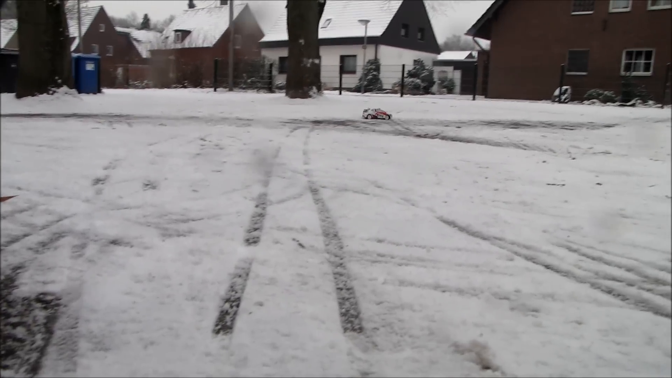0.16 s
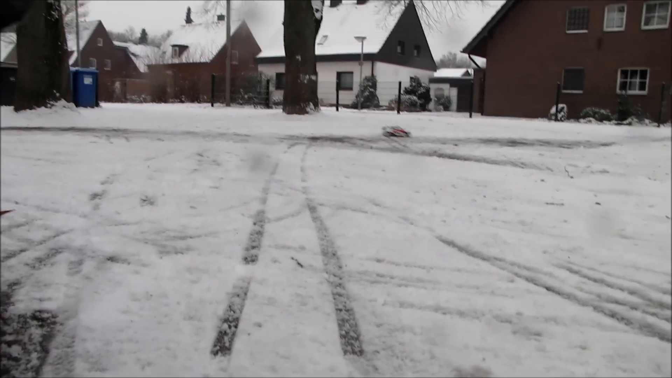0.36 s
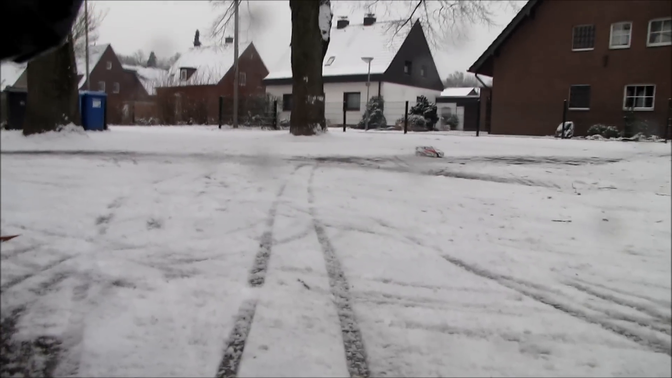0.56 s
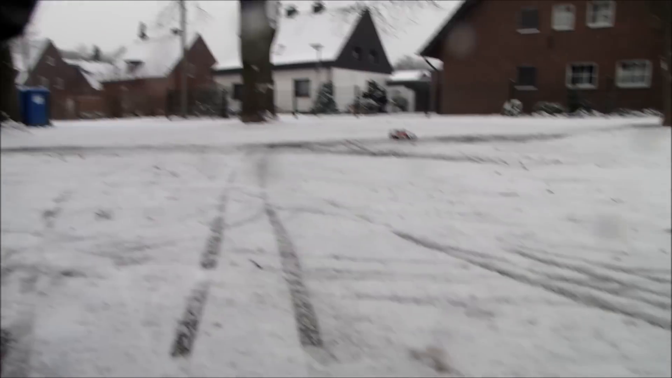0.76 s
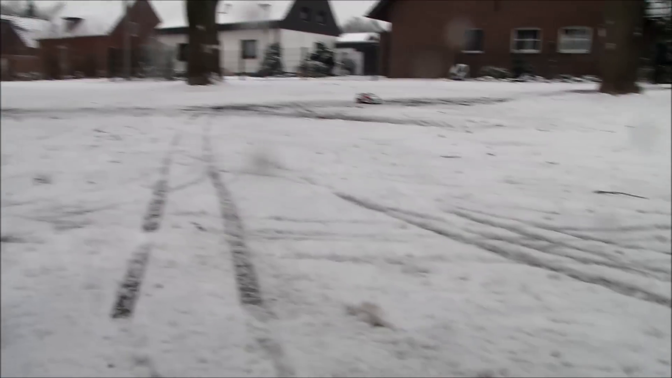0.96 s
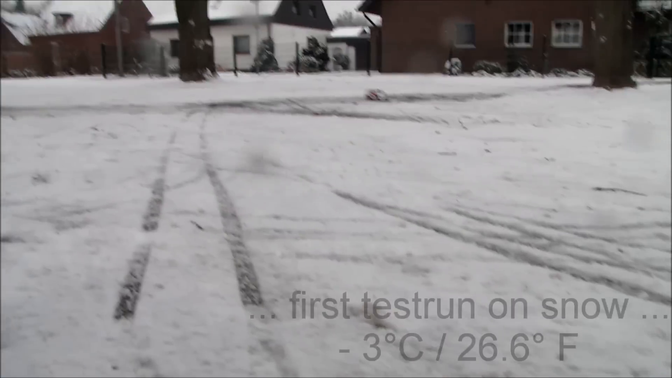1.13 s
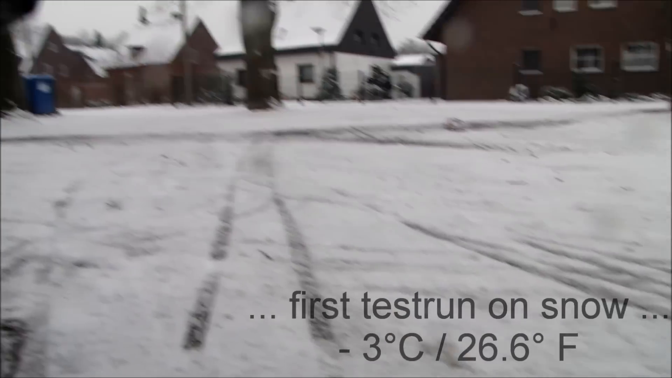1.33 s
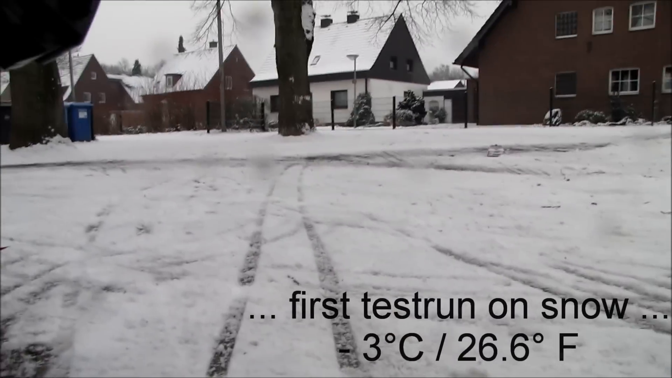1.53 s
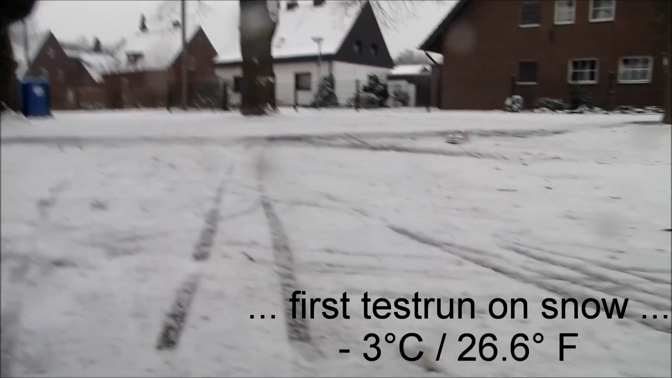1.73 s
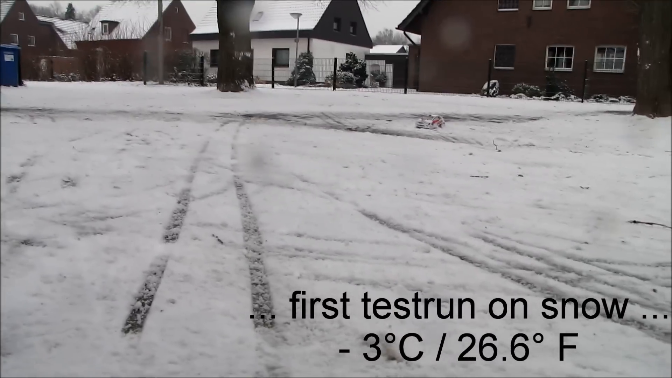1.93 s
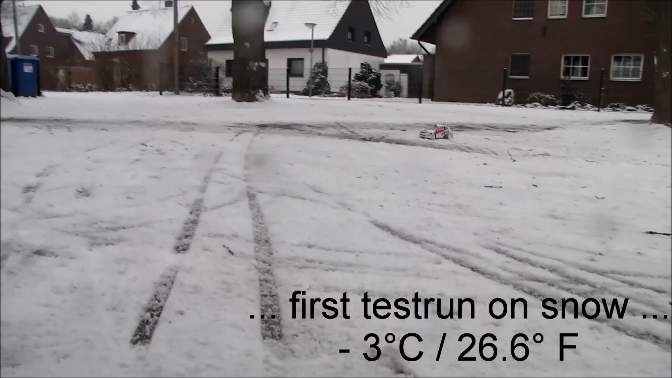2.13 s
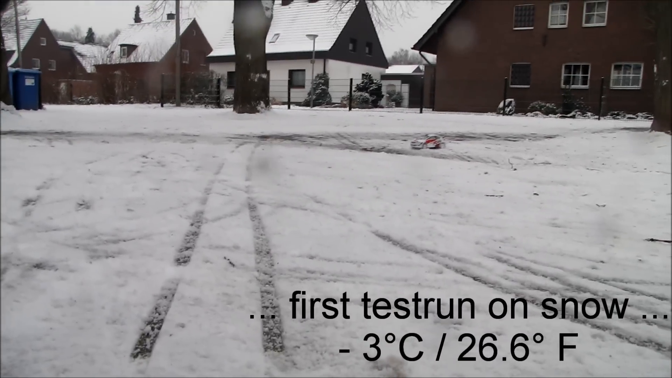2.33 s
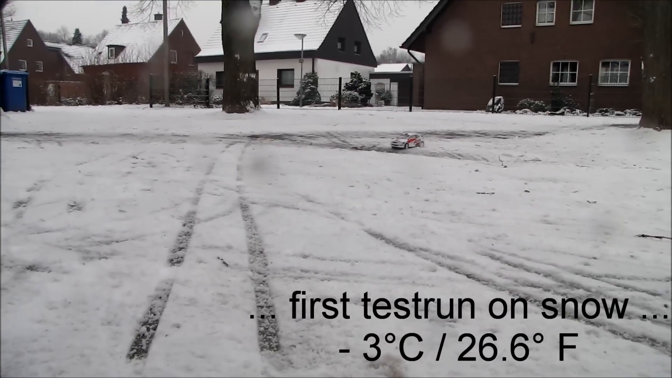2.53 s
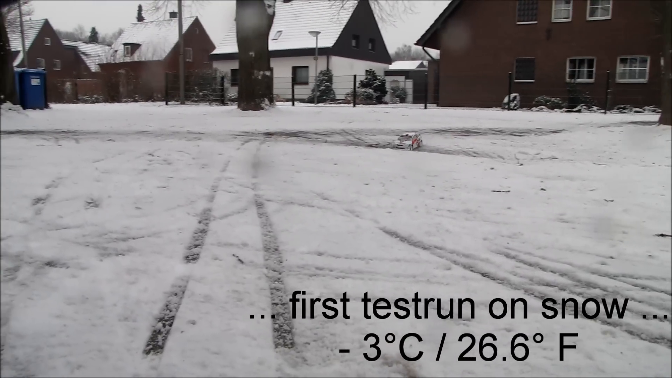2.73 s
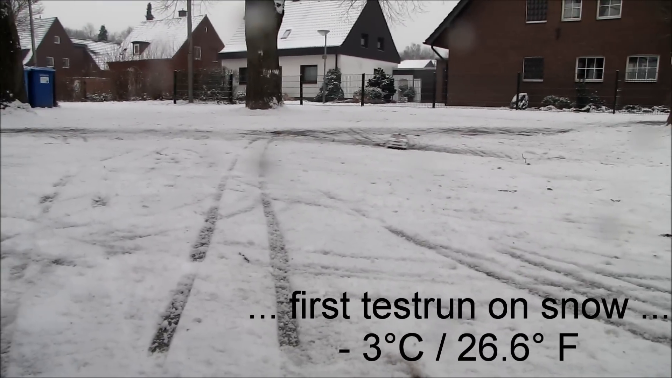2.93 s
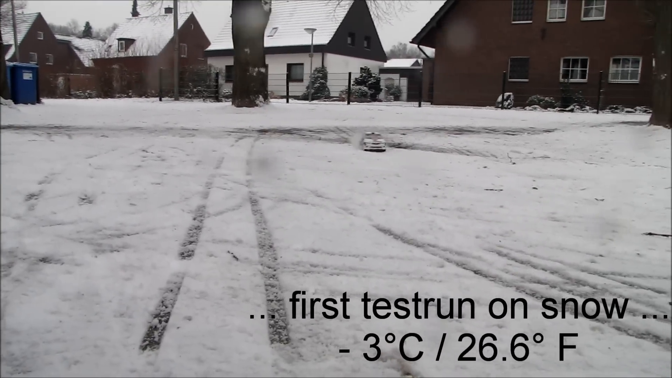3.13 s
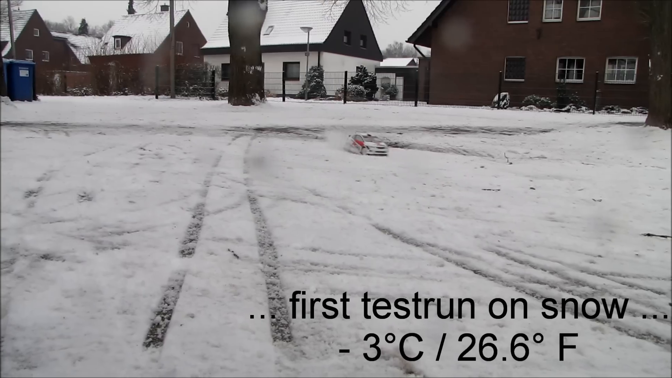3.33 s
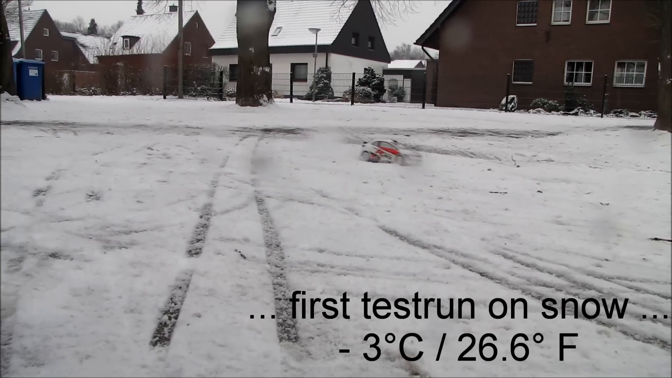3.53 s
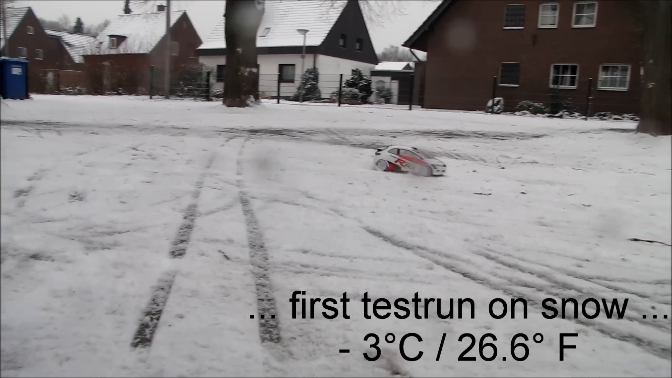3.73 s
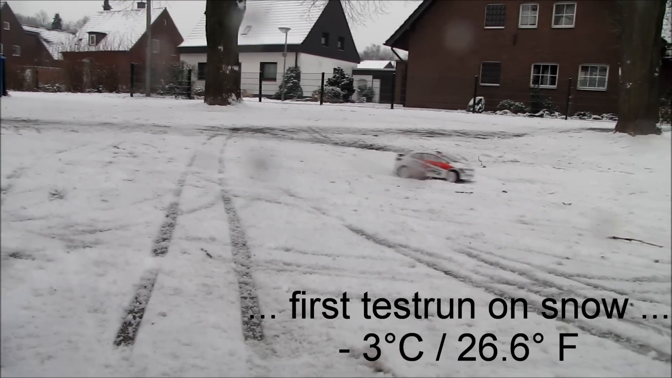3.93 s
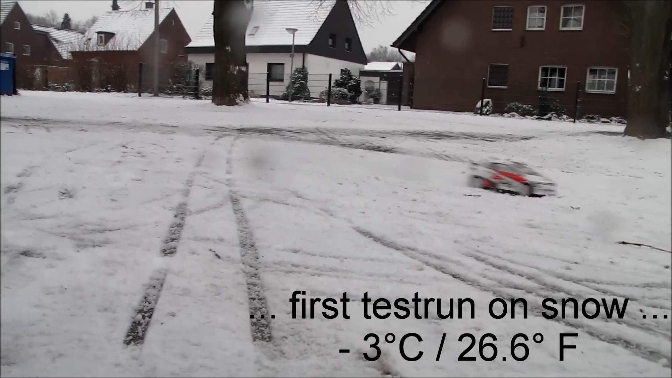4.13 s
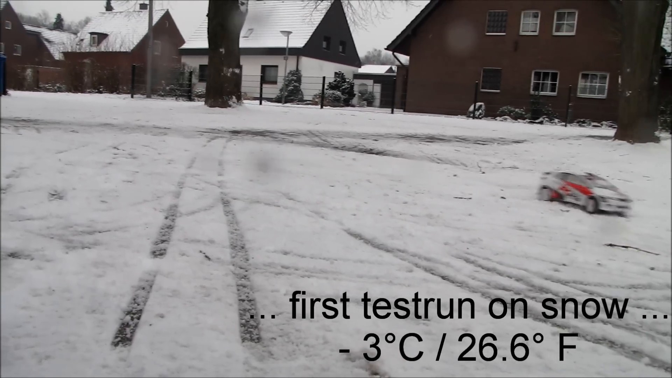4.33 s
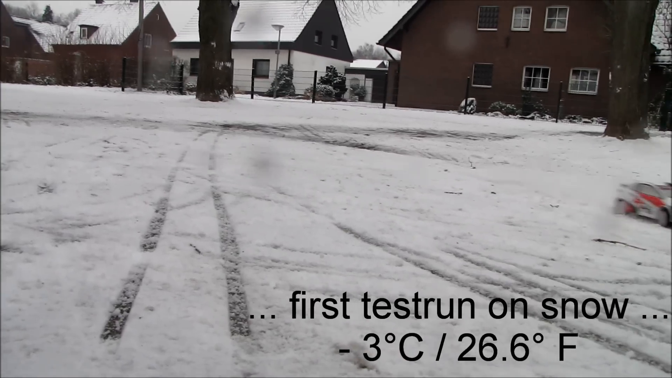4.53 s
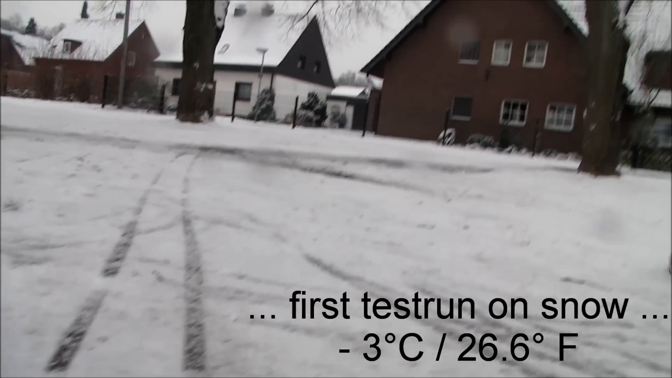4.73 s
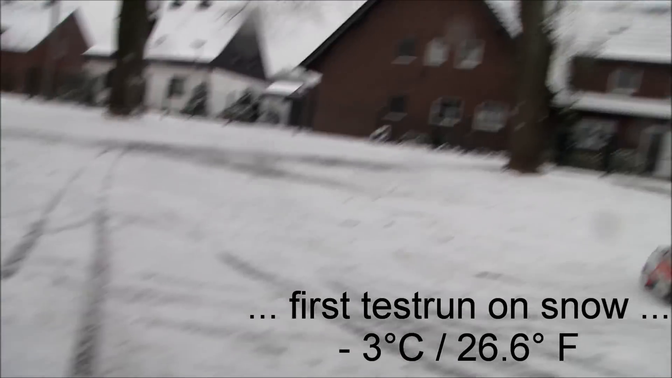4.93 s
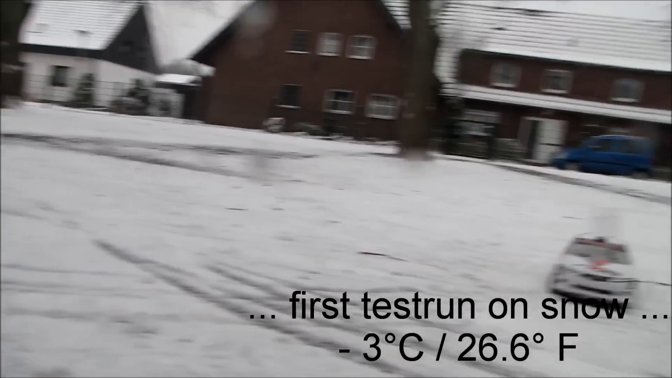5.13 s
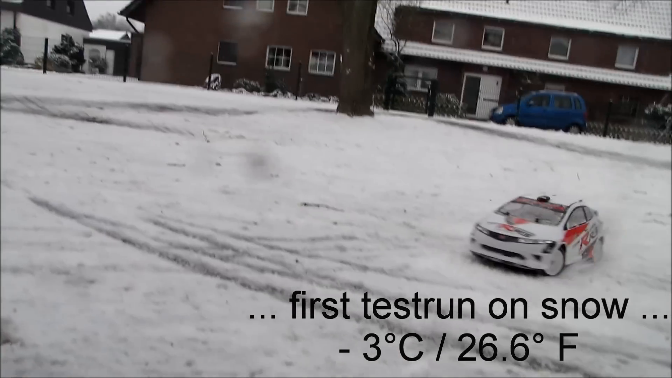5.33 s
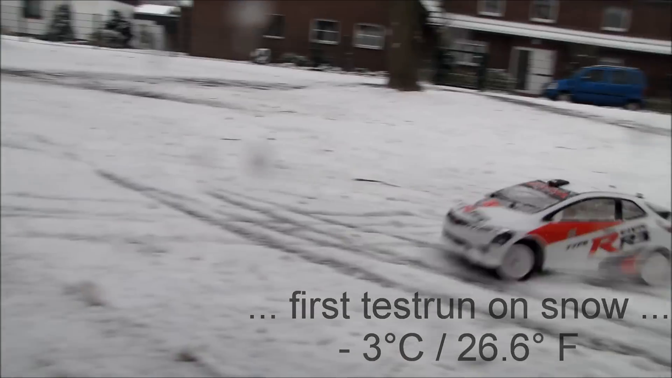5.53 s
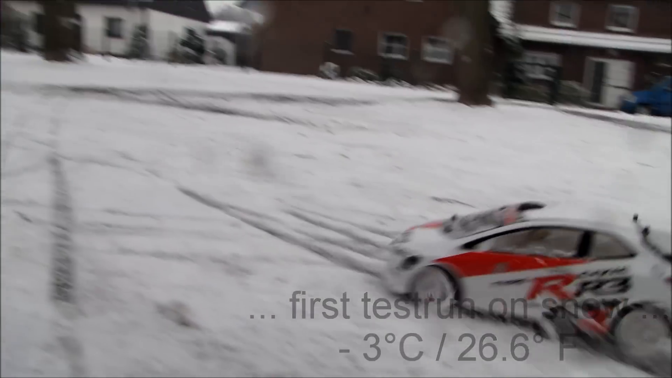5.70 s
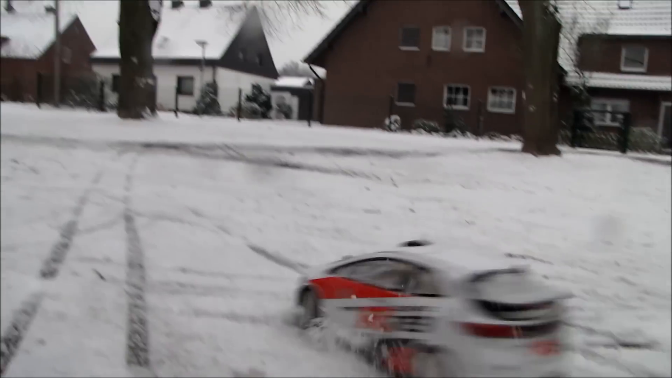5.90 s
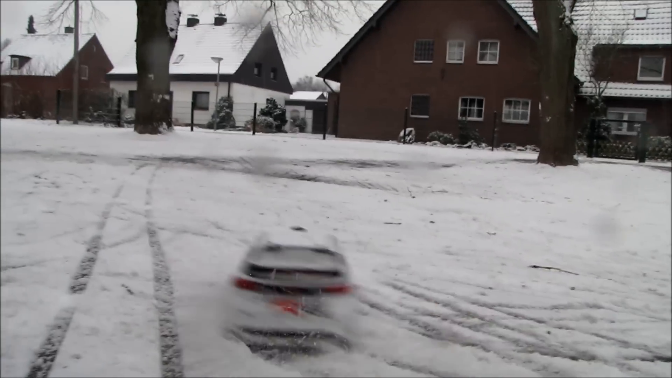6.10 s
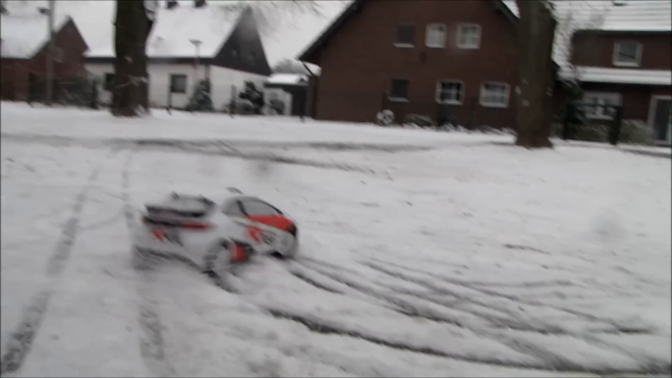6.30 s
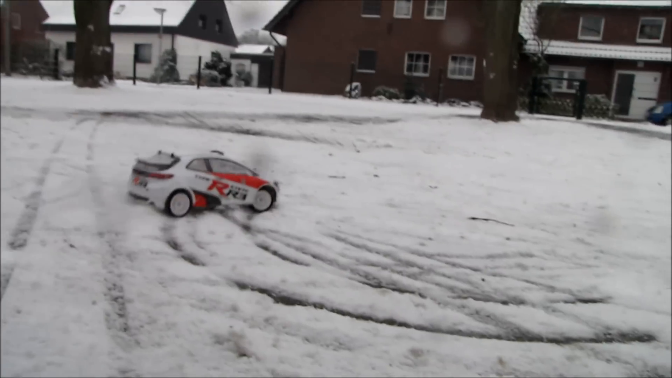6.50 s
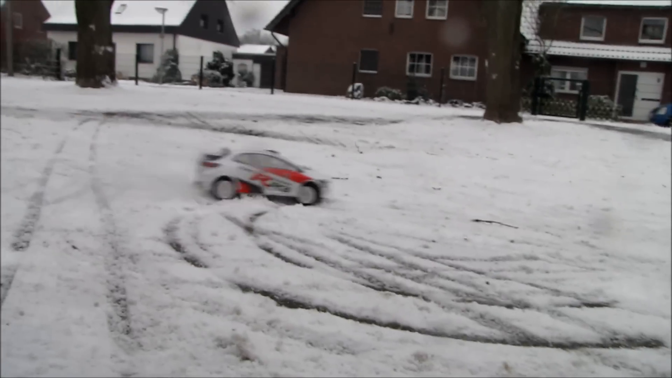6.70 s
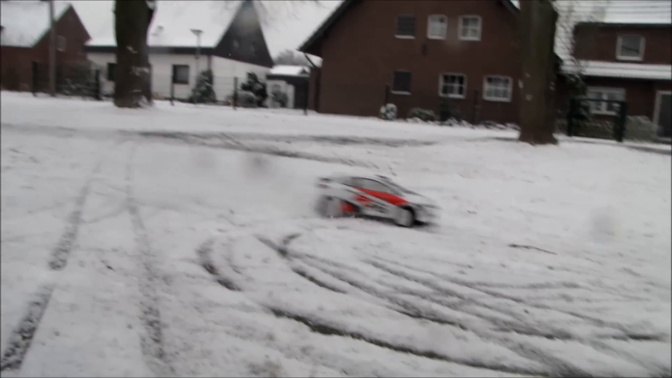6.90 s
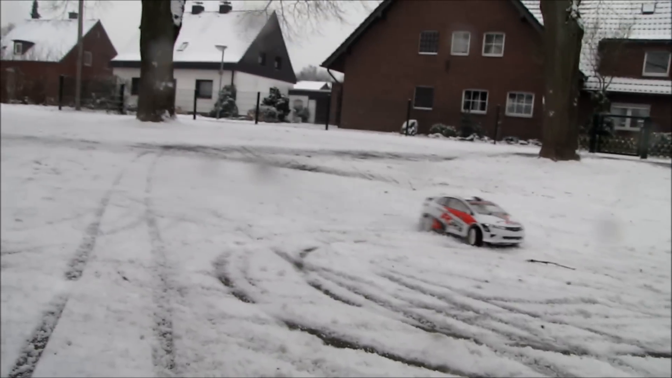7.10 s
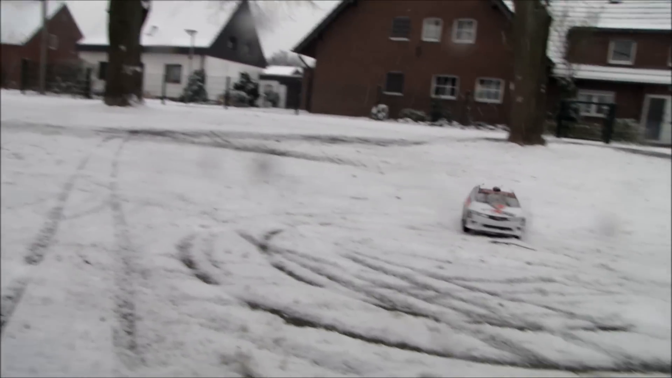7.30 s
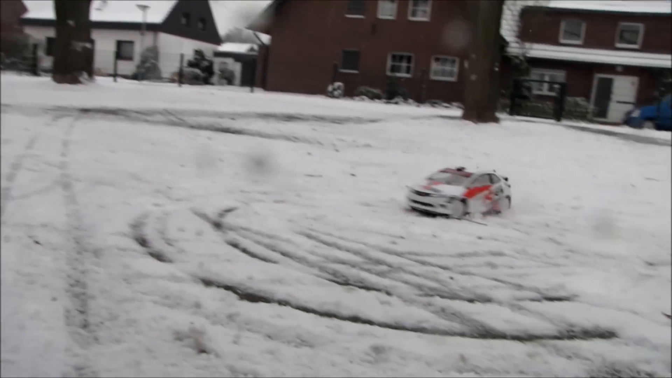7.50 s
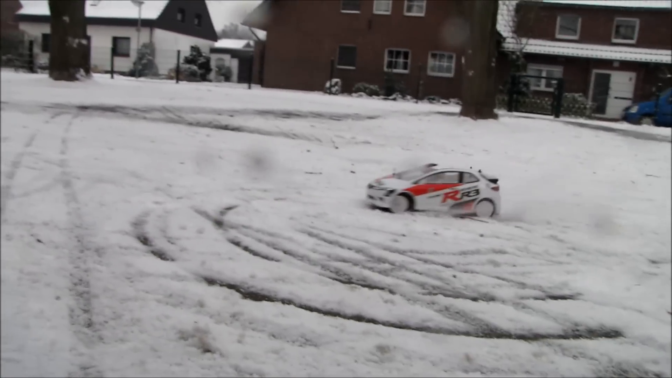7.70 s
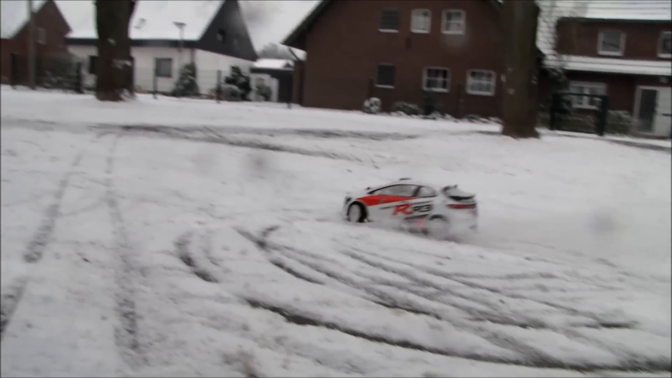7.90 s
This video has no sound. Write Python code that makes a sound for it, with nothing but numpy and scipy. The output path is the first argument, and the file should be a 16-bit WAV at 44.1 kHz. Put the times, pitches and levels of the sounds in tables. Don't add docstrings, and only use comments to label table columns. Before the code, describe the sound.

A small electric model car whines faintly far off, then screams closer in jerky throttle bursts, rattling and knocking over rutted snow outdoors.

```python
import sys
import numpy as np
from scipy import signal
from scipy.fft import rfft, irfft, next_fast_len
from scipy.io import wavfile
from scipy.ndimage import uniform_filter1d, map_coordinates

SR = 44100
rng = np.random.default_rng(int(sys.argv[2]) if len(sys.argv) > 2 else 0)


def int16_out(signal):
    q = np.round(np.clip(np.atleast_2d(signal).T, -1, 1) * 32767)
    wavfile.write(sys.argv[1], SR, q.astype(np.int16))


def amplitude_ratio(level_db):
    exponent = np.asarray(level_db, float) / 20
    return 10 ** exponent


N = 350595

# (frequency [Hz], share [0-1])
ALIKE_SHARE = [(40, 0.9), (150, 0.99), (330, 1), (500, 0.91), (1500, 0.8), (4000, 0.71), (9000, 0.61),
               (15000, 0.51)]


def unit(x):
    return x / np.sqrt(np.mean(x ** 2) + 1e-20)


def along(points, hz):
    f, v = np.transpose(points)
    return np.interp(np.log(hz + 1), np.log(f + 1), v)


def curves(rows):
    s, *cols = np.transpose(rows)
    return [np.interp(np.arange(N) / SR, s, c) for c in cols]


def wobble(rate_hz):
    knots = rng.standard_normal(int(N * rate_hz / SR) + 4)
    return unit(map_coordinates(knots, [np.arange(N) * rate_hz / SR]))


def filtered(x, response):
    m = next_fast_len(N + SR // 2)
    return irfft(rfft(x, m) * response(np.fft.rfftfreq(m, 1 / SR)), m)[..., :N]


def modes(table):
    def response(f):
        total = 0
        for k, (hz, width_hz, db) in enumerate(table):
            ring = 1j * f * width_hz / (hz * hz - f * f + 1j * f * width_hz)
            total = total + (-1) ** k * amplitude_ratio(db) * ring
        return total
    return response


def gritty(rate_hz, spread_db, share):
    hit, size, sign = rng.random((3, N))
    grit = (hit < rate_hz / SR) * amplitude_ratio(-spread_db * np.log(size + .02)) * np.sign(sign - .5)
    share = np.clip(share, 0, 1)
    return np.sqrt(share) * unit(grit) + np.sqrt(1 - share) * rng.standard_normal(N)


def tone(hz, db, blur_rad, flutter_db):
    phase = 2 * np.pi * np.cumsum(hz) / SR + blur_rad * (wobble(130) + .6 * wobble(400))
    flutter = amplitude_ratio(flutter_db * (.45 * wobble(30) + wobble(110)))
    return np.sqrt(2) * amplitude_ratio(db) * unit(flutter) * np.sin(phase)


def drive():
    # (time [s], gear mesh [Hz], mesh load over grind [dB], motor load over hiss [dB])
    far_kick = [(0, 960, -14, -15), (.2, 895, -19, 0), (.38, 961, -26, -15), (.45, 1000, -5, 8),
                (.52, 1050, -14, 6), (.6, 993, -12, -11), (.7, 938, -21, -10)]
    far_circle = [(.85, 920, -22, -1), (.95, 1000, -22, 8), (1.06, 1020, -22, 7), (1.12, 975, -20, 11),
                  (1.3, 1010, -14, 13), (1.46, 1030, -11, 12), (1.54, 640, -8, -14), (1.63, 960, -5, -10),
                  (1.7, 990, -6, -8), (1.78, 995, -12, -14)]
    pull_away = [(2.36, 969, -18, -8), (2.44, 975, -3, -8), (2.53, 1066, -4, -17), (2.63, 1700, -8, -20),
                 (2.7, 1700, -9, -24), (2.78, 1450, -10, -22), (2.95, 1523, -14, -18)]
    run_in = [(3.0, 1584, -10, -4), (3.05, 1970, -24, -3), (3.09, 1990, -26, -3), (3.13, 2312, -19, -6),
              (3.25, 2270, -17, -5), (3.3, 2420, -4, -2), (3.36, 2280, -20, -5), (3.47, 2050, -24, -6),
              (3.55, 1809, -23, -14)]
    crawl = [(3.849, 902, -29, -32), (4.402, 994, -10.5, -28), (4.9, 1008, -28, -0.5),
             (5.15, 1500, -32, -18), (5.4, 1006, -14, 2), (5.8, 966, -14, -5), (5.95, 930, -10, -8),
             (6.29, 1012, -17, 2)]
    slide = [(6.3, 2200, -16, -13), (6.36, 2100, -16, -12), (6.42, 1700, -22, -16), (6.5, 1850, -20, -11),
             (6.56, 1850, -20, -13), (6.6, 1200, -17, 0), (6.66, 1200, -15, 4)]
    spin = [(6.7, 1600, -12, 1), (6.76, 1638, -3, -1), (6.8, 2352, 0, -1), (6.83, 2965, -3, -2),
            (6.9, 3296, -5, 0), (6.96, 3049, -10, -1), (7.0, 2650, -14, 0), (7.035, 1800, -14, -2),
            (7.1, 1300, -18, -19)]
    regrip = [(7.15, 1300, -8, 0), (7.17, 1534, -9, 3), (7.22, 1950, -13, -3), (7.25, 2050, -15, -18),
              (7.31, 2100, -15, -14), (7.35, 2142, -13, -12), (7.37, 1640, -20, -9), (7.46, 1680, -14, -7),
              (7.49, 1560, -10, -2)]
    leaving = [(7.53, 1480, -6, 1), (7.565, 1500, -5, -2), (7.6, 1588, -4, 0), (7.68, 1799, -2, 2),
               (7.73, 1821, -3, -9), (7.77, 2005, -2, 0), (7.82, 2040, -4, 5), (7.88, 2260, -4, 5),
               (7.95, 2332, -5, 3)]
    # (top speed time [s], top mesh [Hz], mesh load [dB], motor load [dB], unloading [dB/s])
    stabs = [
        (4.045, 4000, -3, -5, 110),
        (4.505, 2900, -7, -4, 160),
        (5.518, 3200, 1, -3, 400),
        (6.052, 2650, -8, -13, 100),
        (6.135, 3700, -4, -13, 100),
    ]
    spin_up_hz_per_s, coast_hz_per_s, held_s, inertia_s = 28000, 11000, .012, .015
    mesh_builds_db_per_s, motor_strains_db_per_s = 50, 70
    motor_unloads = 1.2

    t = np.arange(N) / SR
    state = np.array(curves(far_kick + far_circle + pull_away + run_in + crawl + slide + spin
                            + regrip + leaving))
    for s, hz, mesh_db, motor_db, unload in stabs:
        before, after = np.maximum(s - t, 0), np.maximum(t - s - held_s, 0)
        stab = [hz - spin_up_hz_per_s * before - coast_hz_per_s * after,
                mesh_db - mesh_builds_db_per_s * before - unload * after,
                motor_db + motor_strains_db_per_s * before - motor_unloads * unload * after]
        state = np.where(stab[0] > state[0], stab, state)
    return uniform_filter1d(state, round(inertia_s * SR), axis=1)


def effort():
    # (peak time [s], peak level [dB], rise [dB/s], fade [dB/s])
    surges = [(0, -31.5, 35, 42), (.42, -37, 171, 49), (.55, -39, 38, 94), (1.09, -44, 1.5, 23),
              (1.72, -42.5, 22, 92), (1.901, -44.5, 40, 24.5), (2.19, -40, 391, 400), (2.36, -43, 1500, -4),
              (2.77, -31, 35, 14), (3.449, -32.5, 14.5, 33), (3.923, -35.5, 1177, 25),
              (4.01, -25.5, 214, 56), (4.14, -28.5, 76, 90), (4.53, -24.5, 68, 77), (4.7, -36, 102, 85),
              (4.94, -28.5, 59, 33), (5.25, -21, 97, 20.5), (5.489, -19, 112, 30.5), (5.78, -38, 9, 39),
              (6.1, -19.5, 24.5, 34.5), (6.26, -25.5, 35, 400), (6.5, -23, 11, 27), (6.84, -22, 35, 77),
              (6.97, -24.5, 10, 78), (7.23, -25.5, 64, 17.5), (7.79, -22.5, 22.5, 4)]
    # (time [s], rutted ground [dB], gearbox side facing [dB], loose snow [dB])
    track = [(0, -4.5, -4.5, -19), (.48, -3, 0, -20), (1.1, -3, -2.5, -14), (1.6, 4, -9.5, -21.5),
             (2.1, -4, -8, -19), (2.4, -3.5, -10, -22), (2.85, 0.5, -2, -21.5), (3.4, -2, -10, -17),
             (3.65, 2, -11, -29), (4.05, -2, -7, -14.5), (4.6, 0.5, -8.5, -16), (5.0, -5.5, -10, -23),
             (5.4, -7.5, -13, -23), (5.9, -5, -2.5, -14.5), (6.1, -10, -4.5, -53.5), (6.4, -9.5, -7, -16),
             (7.0, -7.5, -8, -20.5), (7.95, -9, -11, -25.5)]
    settle_s = 1
    drum_swing, hiss_swing, spray_swing = 0.031, 0.66, 0.35

    t = np.arange(N) / SR
    power = 0
    for s, db, rise, fade in surges:
        fall_db = np.where(t < s, abs(rise) * (s - t), abs(fade) * (t - s))
        power = power + amplitude_ratio(2 * (db - fall_db))
    grind_db = 10 * np.log10(power + 1e-9)
    swing_db = grind_db - uniform_filter1d(grind_db, round(settle_s * SR))
    ruts_db, facing_db, loose_db = curves(track)
    drum_db = grind_db + ruts_db + drum_swing * swing_db
    hiss_db = grind_db + facing_db + hiss_swing * swing_db
    spray_db = grind_db + loose_db + spray_swing * swing_db
    return drum_db, grind_db, hiss_db, spray_db


def whine():
    # (frequency [Hz], level [dB])
    second_gain = [(2000, -25), (2900, 1), (3600, 1), (4300, 5), (5200, -6), (6500, 2), (8000, -3)]
    side_gain = [(2500, -30), (3400, -7), (4300, 2), (4900, -1), (5600, -18), (8000, -40)]
    pinion_gain = [(4400, -11), (5300, -14), (7000, -8), (7700, -14), (9000, -22), (13000, -36)]
    flicks_per_s, flick_share = 15, .06

    mesh, mesh_db, motor_db = drive()
    _, grind_db, hiss_db, _ = effort()
    first_db, upper_db = grind_db + mesh_db, hiss_db + motor_db
    second_db = upper_db + along(second_gain, 2 * mesh)
    pinion_db = upper_db + along(pinion_gain, 4.4 * mesh)
    mesh = mesh * (1 + .007 * wobble(30))
    main = tone(mesh, first_db + 2.5, .62, 3.2) + tone(2 * mesh, second_db + 3, .55, 2.5)
    side = tone(1.5 * mesh, upper_db + along(side_gain, 1.5 * mesh), .55, 2.5)
    side = side + tone(3 * mesh, upper_db - 7 + along(side_gain, 3 * mesh), .8, 3)
    flick = (np.arange(N) / SR * flicks_per_s + .5 * wobble(6)) % 1 - .5
    pinion_hz = 4.4 * mesh * (1 + flick_share * flick)
    pinion = tone(pinion_hz, pinion_db + 4 + 3 * wobble(20), 1.0, 3.5)
    return main + side + (4.4 * mesh < SR / 2.5) * pinion


def rolling():
    # (frequency [Hz], width [Hz], level [dB])
    shell_modes = [(288, 66, -4), (434, 30, -8), (198, 1100, -17), (87.5, 17, -6)]
    chassis_modes = [(697, 72, -4), (967, 154, -1.5), (1450, 655, -1.5)]
    axle_modes = [(1680, 450, -0.5), (2520, 500, 2.5), (3240, 650, -2.5)]
    gearbox_modes = [(4050, 1000, -8.5), (6320, 2300, -12), (7135, 1035, -10.5)]
    # (frequency [Hz], level [dB per Hz])
    spray_spectrum = [(4410, -16), (7500, -20), (8460, 4.5), (14500, 0.5), (15100, -2), (16000, -61)]

    def shell(f):
        return modes(shell_modes)(f) * f * f / (f * f + 150 ** 2) / (1 + 1j * f / 600)

    def chassis(f):
        return modes(chassis_modes)(f) / np.sqrt(1 + (f / 1850) ** 8)

    drum_db, grind_db, hiss_db, spray_db = effort()
    bumps_db = 0.05 * wobble(8.8) + 0.73 * wobble(35) + 0.72 * wobble(70)
    drum = unit(filtered(gritty(150, 5.0, 0.4), shell))
    grind = unit(filtered(gritty(900, 5.2, 0.51), chassis))
    axles = unit(filtered(gritty(900, 3.1, 0.5), lambda f: modes(axle_modes)(f) * f / (f + 1500)))
    grind = amplitude_ratio(-4.5) * grind + amplitude_ratio(-5.5 + 0.38 * (grind_db + 24.5)) * axles
    hiss = unit(filtered(gritty(1100, 9.0, 0.24), lambda f: modes(gearbox_modes)(f) * f / (f + 3000)))
    spray = unit(filtered(gritty(250, 6.2, 0.15),
                          lambda f: amplitude_ratio(along([(5000, -40)] + spray_spectrum, f))))
    low = amplitude_ratio(drum_db + 0.44 * bumps_db + 0.58 * wobble(25)) * drum
    gears = amplitude_ratio(grind_db + bumps_db) * grind + amplitude_ratio(hiss_db + bumps_db) * hiss
    return low + gears + amplitude_ratio(spray_db + 2 * bumps_db + 1.65 * wobble(90)) * spray


def clacks():
    teeth_per_turn = 39
    level_db, full_from_hz, slope_db_per_khz = -3, 2700, 7

    mesh = drive()[0]
    turn = (np.cumsum(mesh) / SR / teeth_per_turn + .06 * wobble(60)) % 1
    bursts = np.exp(-turn / .08) * amplitude_ratio(1.8 * wobble(70)) * rng.standard_normal(N)
    rung = unit(filtered(bursts, modes([(1300, 500, -7), (2450, 700, 0)])))
    slow_db = np.minimum(mesh - full_from_hz, 0) * slope_db_per_khz / 1000
    return amplitude_ratio(effort()[1] + level_db + slow_db) * rung


def knocks():
    # (time [s], peak level [dB], ring [Hz])
    hits = [(0.095, -17.5, 1230), (2.358, -27, 1735), (1.724, -17.5, 990), (2.356, -23, 1057),
            (3.191, -19, 1526), (3.707, -20, 1630), (3.919, -14, 1220), (3.956, -8, 1230),
            (4.611, -11, 1480), (4.694, -13.5, 1450), (4.947, -9.5, 953), (5.047, -10, 990),
            (5.668, 0, 1570), (5.749, -10, 1730), (6.107, -0.5, 1467), (6.591, 0, 2574), (6.596, -5, 2310),
            (2.4, -30, 1720), (6.626, -3.5, 1114), (7.242, -7, 1290), (7.314, 1, 1280), (7.442, -7.5, 1750),
            (7.765, -0.5, 2128), (5.184, -10, 1005), (5.268, -9, 1323), (5.289, -7, 1433),
            (5.594, -3, 2286), (5.962, -12, 974), (6.325, -10, 4310), (6.569, -6, 1360), (7.158, -11, 1260),
            (7.75, -3, 2153), (1.545, -24, 707)]
    out, t = np.zeros(N + SR), np.arange(SR // 20) / SR
    dull = signal.butter(2, [600, 3500], "band", fs=SR)
    for s, db, hz in hits:
        octave = np.sin(2 * np.pi * 2 * hz * t + rng.uniform(0, 9.0))
        ring = np.sin(2 * np.pi * hz * t) + 0.18 * octave
        crunch = 0.6 * signal.lfilter(*dull, rng.standard_normal(len(t)))
        swell = amplitude_ratio(db - 5.5 - 60 * t / 0.026) * (1 - np.exp(-t / 0.00064))
        out[round(s * SR):][:len(t)] += swell * (ring + crunch)
    return out[:N]


def thumps():
    # (time [s], peak level [dB], ring [Hz])
    landings = [(2.362, -33, 306), (2.946, -19.5, 254), (3.524, -22, 267), (3.568, -25, 311),
                (3.629, -23, 362), (3.916, -31, 301), (4.08, -19, 406), (4.129, -19, 400),
                (4.193, -20, 300), (4.255, -21, 304), (4.411, -20, 280), (4.512, -31, 323.4),
                (4.558, -17, 282), (4.689, -17, 312), (5.048, -16, 292), (5.165, -14, 257),
                (5.231, -13, 287), (5.395, -16, 277), (5.467, -11.5, 251), (5.536, -15, 293),
                (5.664, -18, 311.5), (5.746, -16, 308.5), (5.79, -19, 283), (5.869, -11.5, 290.7),
                (5.913, -13, 325), (5.998, -13, 275), (6.091, -22, 284), (6.137, -29, 261.4),
                (6.2, -18, 301), (6.241, -18, 283), (6.321, -23, 291), (6.381, -20, 299),
                (6.537, -17.5, 255), (6.84, -24, 343), (6.905, -21, 306), (6.975, -16, 306),
                (7.091, -22, 310), (7.338, -18, 288), (7.522, -18, 292.7), (7.75, -18, 272)]
    out, t = np.zeros(N + SR), np.arange(SR // 8) / SR
    for s, db, hz in landings:
        swell = amplitude_ratio(db - 1.5 - 60 * t / 0.078) * (1 - np.exp(-t / 0.0019))
        out[round(s * SR):][:len(t)] += swell * np.sin(2 * np.pi * hz * t)
    return out[:N]


def puffs():
    # (time [s], peak level [dB], middle [Hz])
    throws = [(0.2105, -23.5, 4510), (.425, -35, 4200), (.449, -35, 4700), (0.4764, -22.5, 4300),
              (.505, -27, 4400), (0.529, -31, 4300), (0.5736, -38, 6040), (0.661, -42, 5540),
              (0.8616, -30, 4940), (0.93, -27, 4750), (1.049, -27.5, 5640), (1.175, -32, 4640),
              (1.2878, -35, 4650), (2.174, -45, 4430), (2.5059, -26.5, 5030), (2.656, -19.5, 4800),
              (2.721, -20, 4640), (2.8894, -18, 5960), (3.5187, -19, 5000), (3.5493, -25, 5640),
              (3.8886, -38, 5770), (3.9135, -37, 5660), (5.2694, -22, 4640), (5.436, -18, 5390),
              (5.669, -16, 4680), (6.1973, -16, 5340), (6.262, -20, 4500), (6.43, -24, 4000),
              (6.5903, -18, 4730), (7.212, -24, 4930), (7.4142, -35, 4640)]
    out, t = np.zeros(N + SR), np.arange(SR // 20) / SR
    for s, db, hz in throws:
        band = signal.butter(1, [.8 * hz, 1.7 * hz], "band", fs=SR)
        burst = unit(signal.lfilter(*band, rng.standard_normal(len(t))))
        swell = amplitude_ratio(db + 3.0 - 60 * t / 0.012) * (1 - np.exp(-t / 0.00099))
        out[round(s * SR):][:len(t)] += swell * burst
    return out[:N]


def whistle():
    # (start [s], end [s], level [dB])
    spells = [
        (0.944, 1.395, -60),
        (1.996, 2.15, -81),
        (4.272, 4.43, -42.5),
        (4.77, 5.201, -52),
        (5.75, 5.997, -44),
        (6.28, 6.657, -41.5),
    ]
    t = np.arange(N) / SR
    gate = 0
    for start, end, db in spells:
        gate = gate + amplitude_ratio(db) * np.clip(np.minimum(t - start, end - t) / 0.01, 0, 1)
    return gate * tone(np.full(N, 5740.), 0, 0.16, 0.69)


def ports(x):
    # (time [s], left-right level [dB], left port lag [us])
    bearing = [
        (0, -0.5, 35),
        (2, -1, 62),
        (3.4, -1, 29),
        (4.1, -2.5, 51),
        (4.7, -4, 93.5),
        (5.8, -3, 72),
        (6.2, -0.5, 30.7),
        (6.7, -0.5, 1.7),
        (7.2, -2.5, 40.6),
        (7.95, -2, 57.4),
    ]

    def alike(f):
        return np.clip(along(ALIKE_SHARE, f), 0, 1 - f / 20000)

    z = signal.stft(x, nperseg=512)[2]
    drift = np.cumsum(.6 * rng.standard_normal((2,) + z.shape), axis=2)
    phase = drift + 2 * np.pi * rng.random((2, len(z), 1))
    unlike = signal.istft(z * np.exp(1j * phase), nperseg=512)[1][:, :N]
    unlike = unlike * np.std(x) / np.std(unlike)
    pan_db, lag_us = curves(bearing)
    direct = filtered(x, lambda f: np.sqrt(np.abs(alike(f))))
    pair = [map_coordinates(direct, [np.arange(N) + way * lag_us * SR / 2e6], order=5)
            for way in (-1, 1)]
    pair = pair + filtered(unlike, lambda f: np.sqrt(1 - alike(f)))
    bass = filtered(pair, lambda f: 1 / (1 + (f / 600) ** 2))
    return bass + (pair - bass) * amplitude_ratio(pan_db * [[.5], [-.5]])


def ticks():
    # (time [s], peak level [dB], ring [Hz], low part [dB], left-right level [dB])
    crumbs = [
        (3.4995, -7, 4700, -9, -1),
        (3.6128, -12, 5540, -22, 5),
        (3.8168, -5, 5150, -9, 5),
    ]
    out, t = np.zeros((2, N + SR)), np.arange(SR // 30) / SR
    dull = signal.butter(2, [900, 3500], "band", fs=SR)
    for s, db, hz, low_db, pan_db in crumbs:
        noise = rng.standard_normal((2, len(t)))
        swell = amplitude_ratio(-60 * t / 0.0072) * (1 - np.exp(-t / 0.00014)) ** 2
        snap = swell / swell.max() * (np.sin(2 * np.pi * hz * t) + .8 * noise[0])
        rattle = amplitude_ratio(low_db + 10 - 60 * t / .025) * signal.lfilter(*dull, noise[1])
        gain = amplitude_ratio(db + np.array([[.5], [-.5]]) * pan_db)
        out[:, round(s * SR):][:, :len(t)] += gain * (snap + rattle)
    return filtered(out[:, :N], lambda f: 1 / (1 + 1j * f / 7000) ** 3)


def street():
    # (frequency [Hz], level [dB per Hz])
    hush_spectrum = [(8.8, -34), (15, 1), (97, 2), (146, -3), (269, -5.5), (330, -14), (497, -16),
                     (770, -14), (1190, -33), (1960, -28.5), (5130, -27.5), (14700, -47), (16000, -52)]

    def mid_side(f):
        turn = np.arccos(np.clip(along(ALIKE_SHARE, f) - .01, -1, 1)) / 2
        return amplitude_ratio(along(hush_spectrum, f)) * [np.cos(turn), np.sin(turn)]

    mid, side = filtered(rng.standard_normal((2, N)), mid_side)
    return amplitude_ratio(-44.5 + 0.99 * wobble(2.96)) * unit(np.array([mid + side, mid - side]))


def scene():
    car = whine() + rolling() + clacks() + knocks() + thumps() + puffs() + whistle()
    return ports(car) + ticks() + street()


def roll_off(x):
    return signal.sosfilt(signal.butter(12, 16500, fs=SR, output="sos"), x)


def record(dry):
    mix = filtered(dry, lambda f: f < 15880)
    return roll_off(mix)


dry = scene()
out = record(dry)
int16_out(out)
```